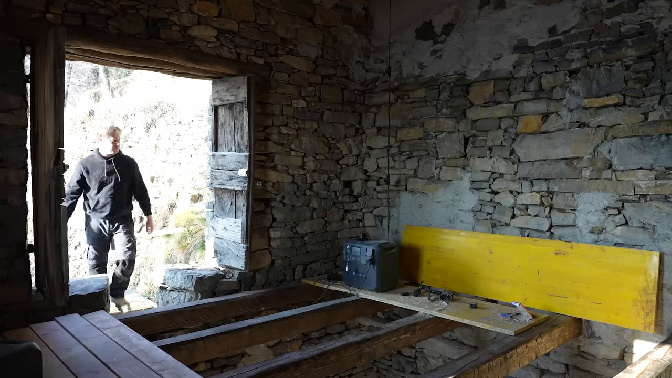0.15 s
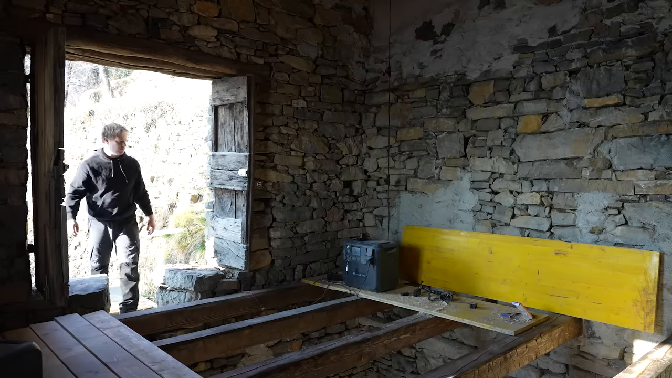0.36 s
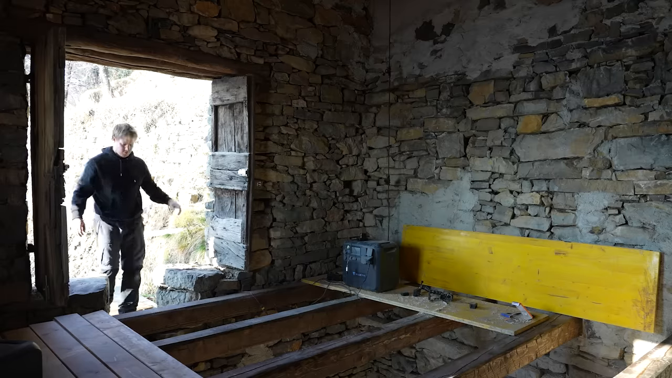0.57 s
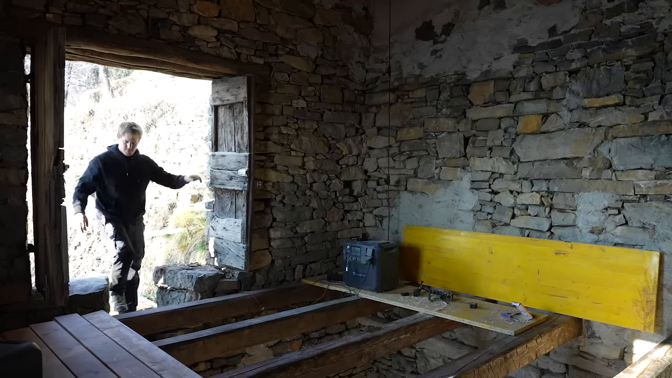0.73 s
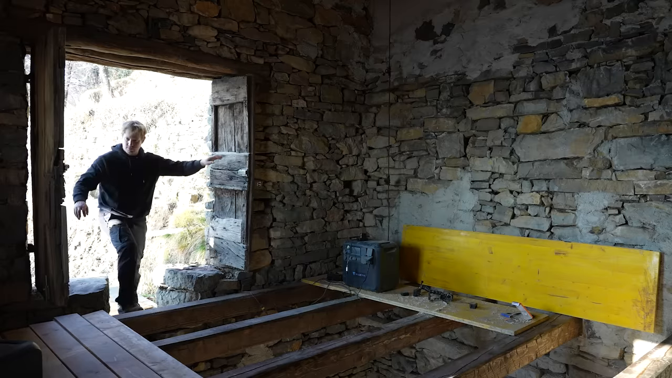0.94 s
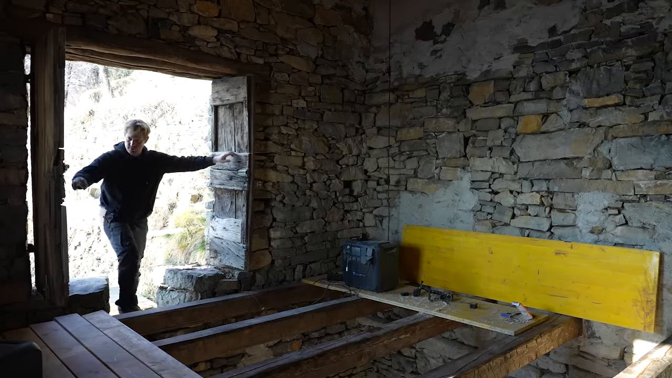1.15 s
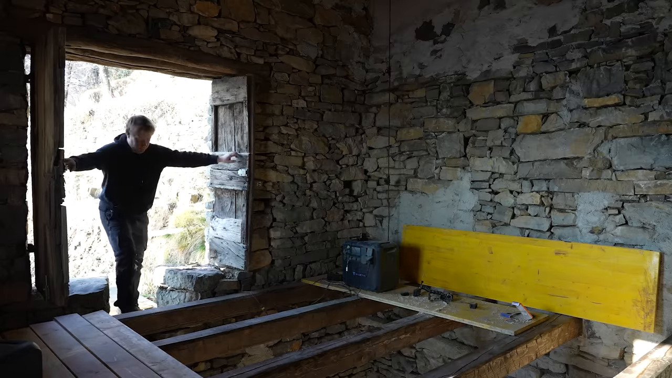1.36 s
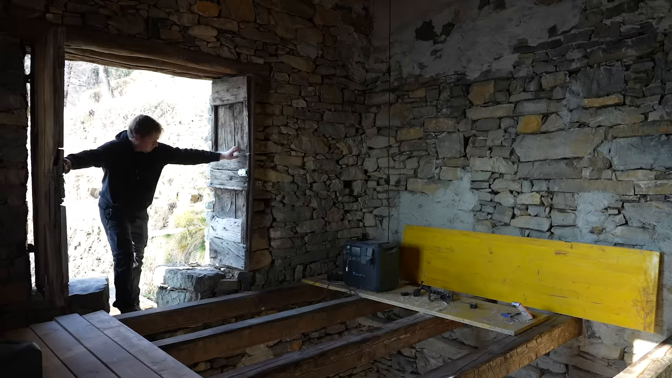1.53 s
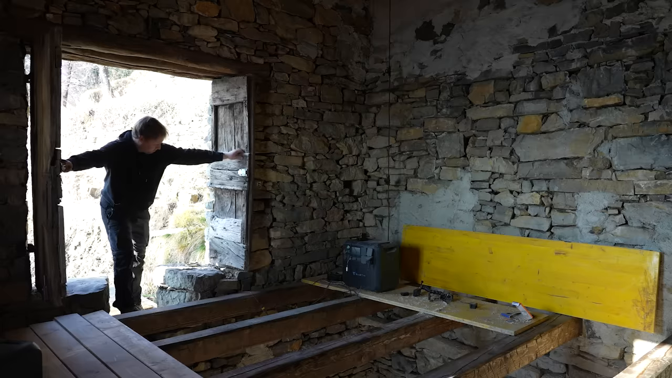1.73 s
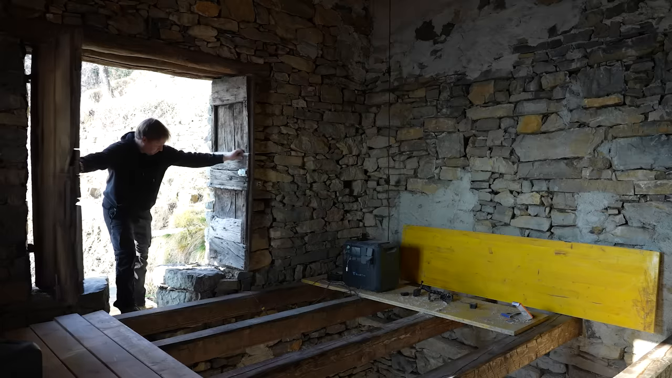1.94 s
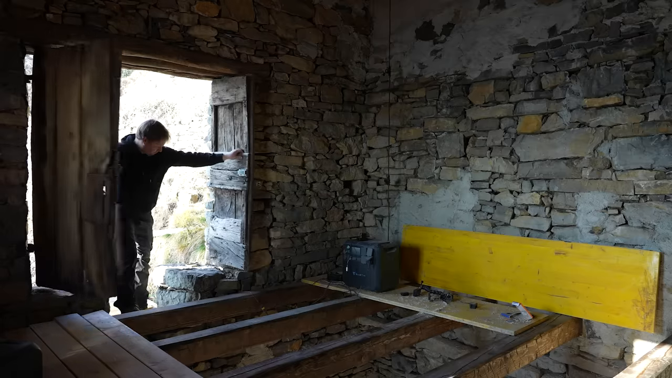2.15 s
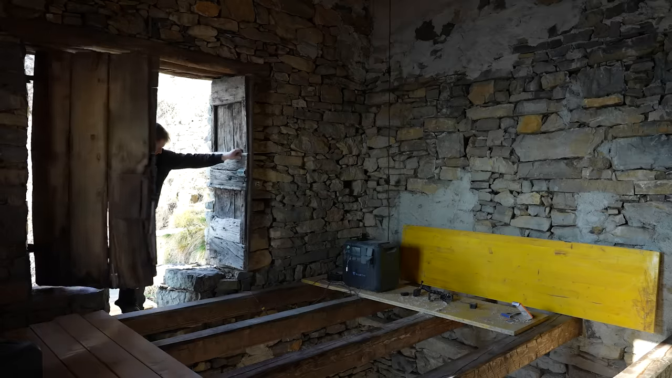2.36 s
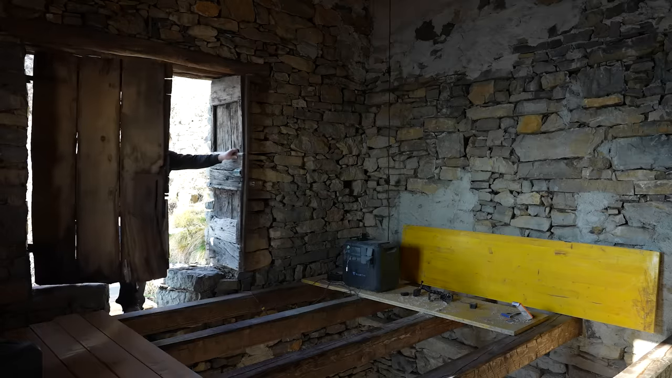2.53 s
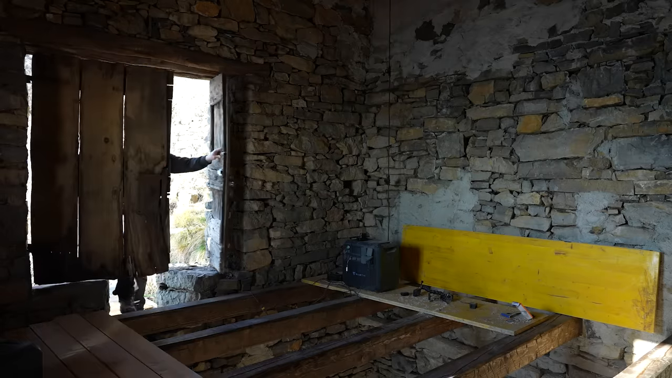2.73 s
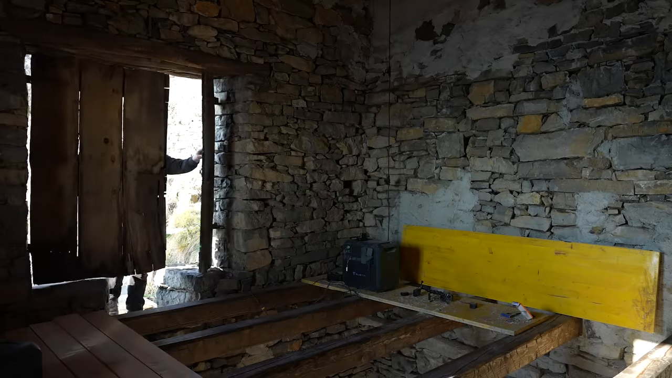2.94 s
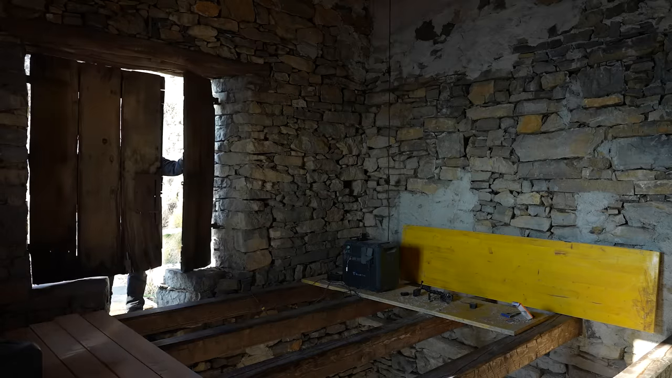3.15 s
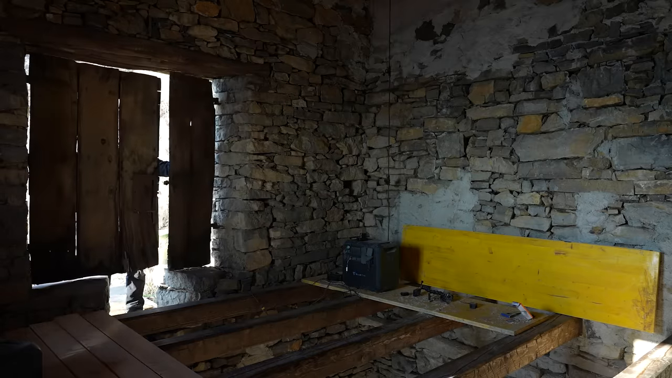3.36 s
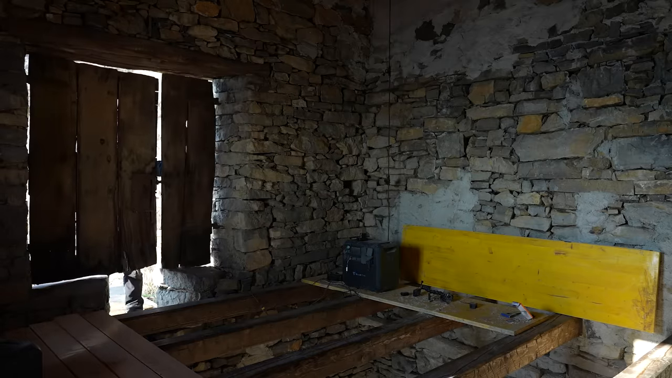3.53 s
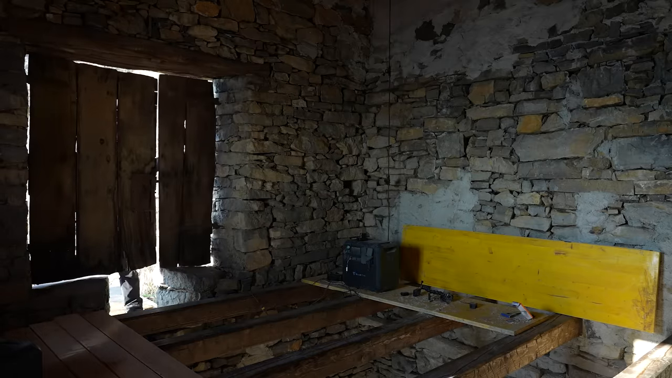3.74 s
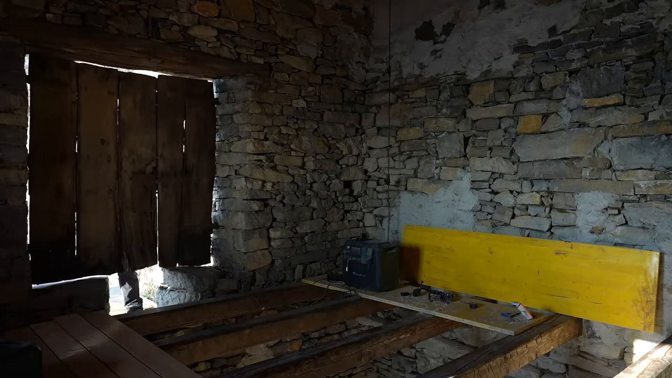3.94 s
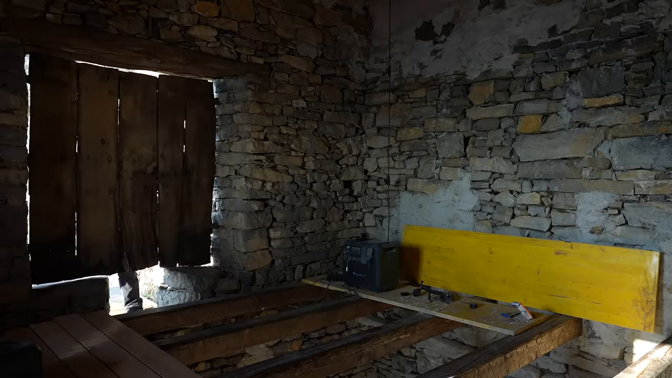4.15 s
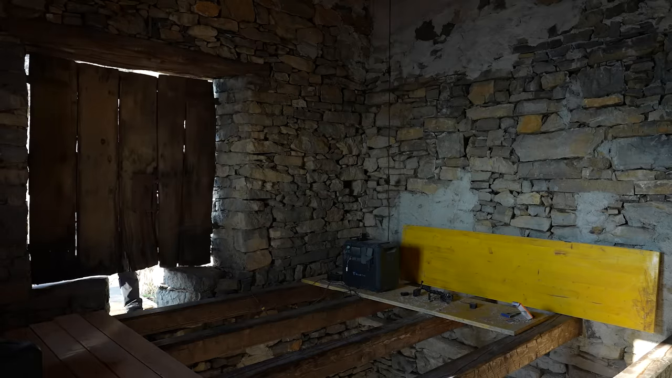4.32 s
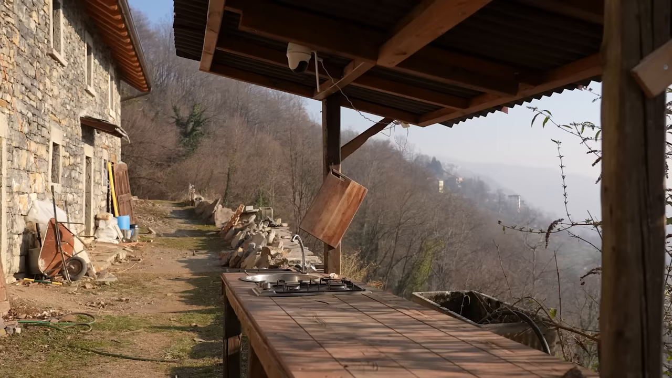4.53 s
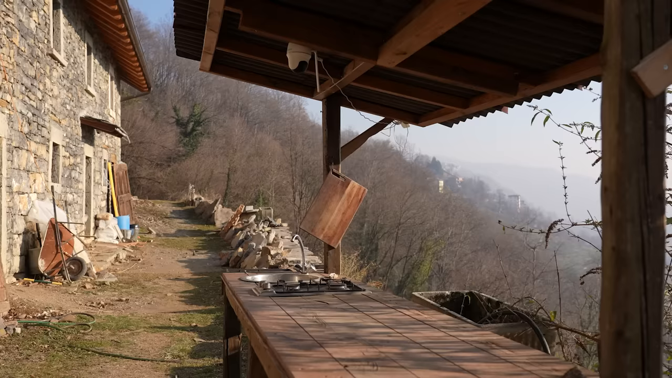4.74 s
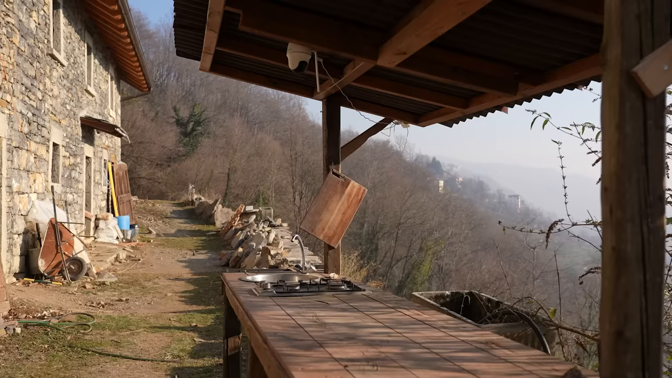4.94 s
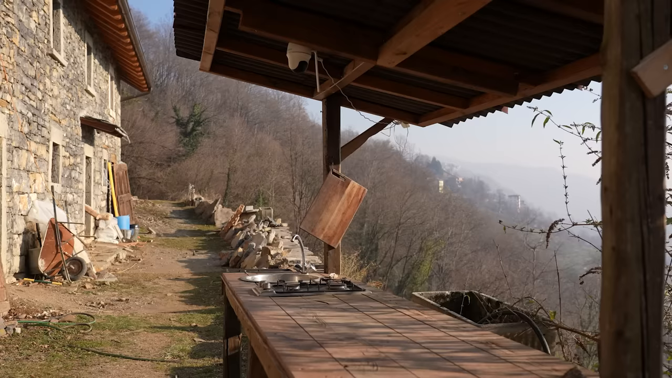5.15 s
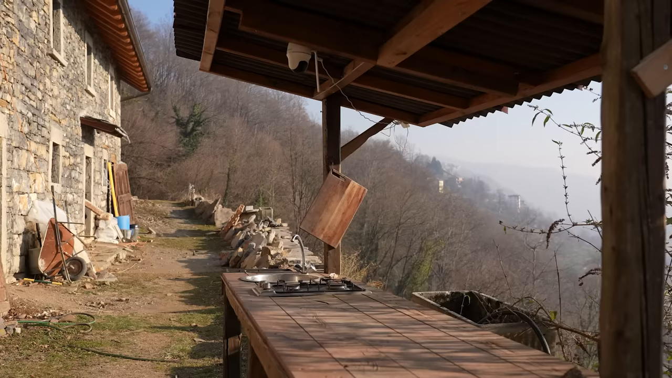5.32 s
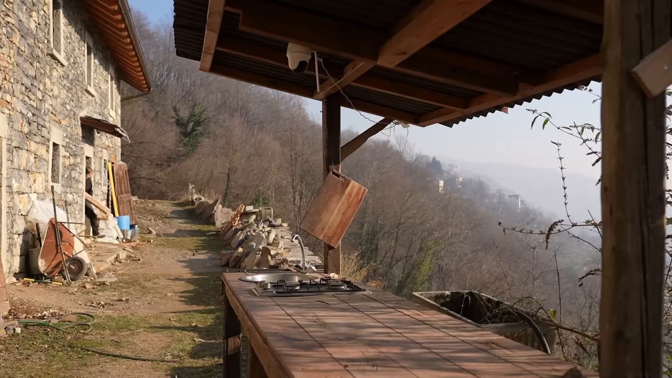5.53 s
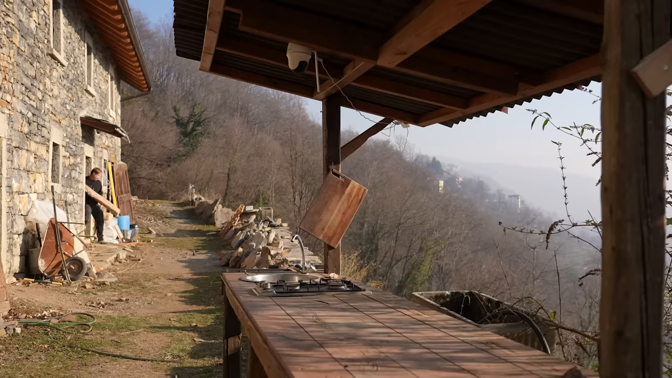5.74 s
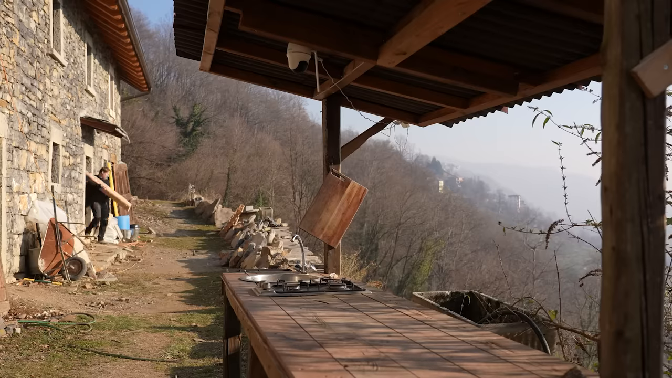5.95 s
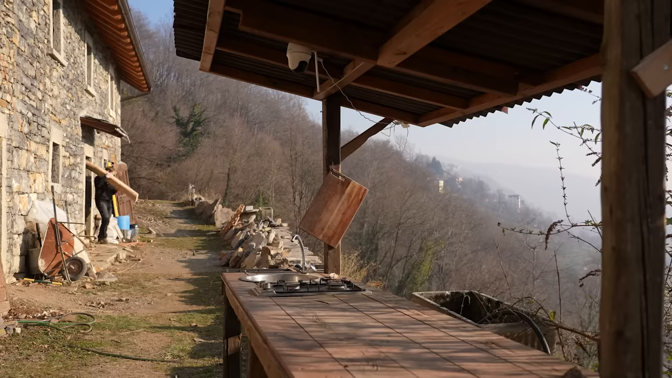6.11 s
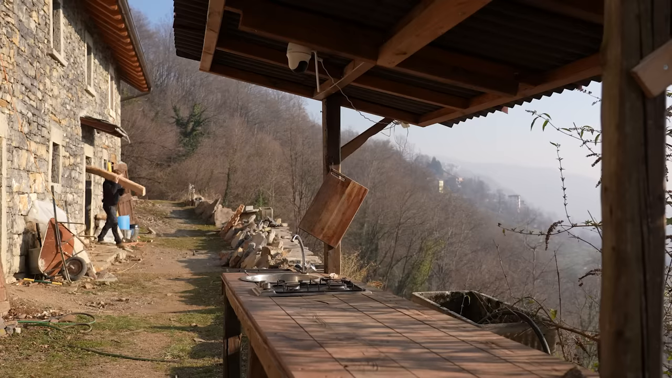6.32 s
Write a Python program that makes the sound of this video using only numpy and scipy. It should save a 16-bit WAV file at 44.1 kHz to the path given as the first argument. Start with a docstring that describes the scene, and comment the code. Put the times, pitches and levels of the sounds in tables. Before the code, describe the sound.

Light steps and scuffs on boards, a heavy knock, then an iron latch clicks. Two dry wooden leaves swing closed with thin wavering squeals that overlap, peaking in a piercing, pitch-bending shriek with a hollow lower tone. Wood groans and bangs, with a short stony reverberation. After the last thunk everything drops to faint hillside rumble, barely audible far bird calls and tiny distant knocks, heard from a fixed position.

```python
"""Steps and knocks sound first, in a small stone room: decaying noise through wood, edge and iron spectra.
Two old plank door leaves are then pulled shut: the panel booms as a low sine, the rusty hinge pins squeal
as wavering harmonic tones, several at once, and the wood drags as shaped noise. Last comes the open air:
rumble and hiss of filtered noise, a far cockerel and a small bird as gliding tones, and light ticks."""
import sys
import numpy as np
from scipy import signal
from scipy.fft import rfft, irfft, next_fast_len
from scipy.io import wavfile
from scipy.ndimage import map_coordinates

SR = 44100
rng = np.random.default_rng(int(sys.argv[2]) if len(sys.argv) > 2 else 0)


def pcm_store(signal):
    """Save signal as 16-bit PCM."""
    levels = np.round(np.clip(np.atleast_2d(signal), -1, 1) * 32767)
    wavfile.write(sys.argv[1], SR, levels.astype(np.int16).T)


N = 285856

# Long hinge notes, one list each: (time [s], pitch [Hz], fundamental [dB], 2nd partial [dB])
HINGE_NOTES = [
    [(2.13, 2835, -46.5, -62.5), (2.155, 2815, -35.5, -34.5), (2.22, 2790, -25.5, -31),
     (2.28, 2755, -26.5, -36.5), (2.32, 2765, -25, -22), (2.4, 2699, -22.5, -25.5), (2.52, 2676, -36, -48),
     (2.56, 2760, -28, -42.5), (2.62, 2790, -32, -48), (2.69, 2830, -45, -60.5)],
    [(2.655, 3386, -31.5, -36.5), (2.765, 3123, -41.5, -49), (2.81, 3133, -22.5, -32),
     (2.885, 3092, -25.5, -21.5), (3.0, 3019, -34, -42.5), (3.2, 3080, -57, -68.5)],
    [(2.975, 4415, -39.5, -72.5), (3.05, 4316, -24, -34), (3.085, 4290, -15.5, -21),
     (3.17, 4228, -13, -24.5), (3.285, 4274, -14.5, -34.5), (3.37, 4228, -19.5, -37),
     (3.4, 4134, -27.5, -44), (3.48, 4188, -23.5, -31.5), (3.56, 4163, -28, -47),
     (3.72, 4187, -43.5, -66.5)],
    [(2.98, 1344, -52.5, -70.5), (3.02, 1180, -31, -45.5), (3.06, 1182, -27, -36.5),
     (3.125, 1167, -39.5, -30), (3.18, 1158, -27, -34.5), (3.235, 1154, -30.5, -38.5),
     (3.33, 1121, -41, -53)],
]
# Grip of the pin in each long note: (pitch waver [share], throb [dB], 3rd over 2nd partial [dB],
# 4th over 3rd partial [dB], further fall [dB per partial])
HINGE_GRIP = [(.005, 3.5, -9, -11.5, 4), (0.005, 4, -12.5, -6, 7.5), (.001, 3, -2, -18.5, 10),
              (.006, 3, -17, -1, 9)]
# Short hinge notes: (start [s], rise [s], length [s], first pitch [Hz], last pitch [Hz], peak [dB],
# fall [dB/s], 2nd over 1st partial [dB], 3rd over 2nd partial [dB], pitch waver [share])
SQUEAKS = [(2.065, 0.021, 0.13, 893, 912, -33.5, 122, -17.5, -14, 0.039),
           (2.385, .01, .15, 2310, 2240, -29, 170, -16, -4.5, .03),
           (2.87, .01, .11, 1833, 1814, -45, 99, -20.5, -17, .005),
           (3.288, .022, 0.23, 2378, 2280, -22, 80.5, -15, -17.5, 0.01)]
# Grip in the short notes: (throb [dB], 4th over 3rd partial [dB], further fall [dB per partial])
SQUEAK_GRIP = (5.8, -22, 12)
# Hollow odd-partial note, settling an octave under the loudest note:
# (time [s], pitch [Hz], fundamental [dB], 3rd partial [dB])
HOLLOW_NOTE = [(3.3, 2217, -42, -36), (3.345, 2160, -28, -21), (3.375, 2140, -30, -37),
               (3.4, 2086, -17.5, -29.5), (3.48, 2090, -17.5, -25.5), (3.535, 2079, -30, -24.5),
               (3.56, 2095, -50, -47)]
# Its grip: (pitch waver [share], throb [dB], 5th over 3rd partial [dB], 7th over 5th [dB],
# further fall [dB per partial])
HOLLOW_GRIP = (0.01, 4, -13, -10.5, 8)
# Jolts of the leaf that break up the squeal: (start [s], end [s], pitch waver [factor])
JOLTS = [(2.377, 2.68, 2.8), (3.293, 3.388, 2.8), (3.522, 3.75, 7.8)]
# Pins briefly losing their grip: (time [s], level change [dB], half length [s])
FALTERS = [(2.187, -12, 0.0019), (2.287, -11, 0.013), (2.374, -16.5, 0.0025), (2.505, -29.5, 0.0049),
           (2.538, -34.5, .006), (2.631, -12.5, 0.006), (2.86, -12.5, 0.0081), (3.137, -6.5, 0.0072),
           (3.182, -8, 0.0021), (3.203, -11, 0.0039), (3.264, -11.5, 0.0053), (3.386, -6.5, 0.0094),
           (3.531, -14.5, 0.0055)]
# Groan of each leaf as it moves: (time [s], level [dB])
LEAF_DRAG = [
    [(2.029, -43.5), (2.35, -46), (2.64, -39.5), (2.77, -29.5), (3.05, -62), (3.2, -62.5)],
    [(3.2, -65), (3.3, -53.5), (3.45, -63), (3.62, -46.5), (3.82, -53), (3.95, -39), (4.35, -67)],
]
# Shake of the frame over the groan, one value per leaf: (level [dB])
FRAME_SHAKE = [-5.5, 4.5]
# Spectrum of the groan: (frequency [Hz], relative density [dB])
GROAN_SPECTRUM = [(53, -30.5), (90, 0.5), (119, -0.5), (201, -1), (319, 1), (797, 0), (1420, -10.5),
                  (2600, -16.5), (3380, -45.5), (5720, -120)]
# Grit grinding in the hinges: (peak time [s], peak [dB], rise [dB/s], fall [dB/s])
GRIT_SWELLS = [(2.77, -55.5, 79.5, 50), (3.62, -43.5, 44.5, 69.5), (3.95, -64, 70, 85)]
# Swells of the panel's lowest mode: (peak time [s], peak [dB], rise [dB/s], fall [dB/s], pitch [Hz])
PANEL_SWELLS = [(1.16, -31, 256, 69, 79.5), (1.33, -37.5, 118, 55, 80.6), (2.28, -34, 198, 224, 71),
                (2.4, -34, 238, 210, 72.9), (2.52, -28, 300, 260, 73), (2.66, -34.5, 149, 56, 75),
                (2.76, -34, 99, 106, 73.4)]
# Blows, levels before decay and room: (time [s], wood [dB], hard edge [dB], edge pitch [Hz],
# iron [dB], decay time constant [s])
KNOCKS = [(0.009, -43.5, -52, 1960, -61, 0.012), (0.435, -40.5, -66, 1560, -73, 0.01),
          (0.448, -44.5, -54, 2920, -61.5, 0.021), (0.531, -57, -45, 2920, -76, 0.011),
          (0.557, -39.5, -43.5, 2120, -72, 0.013), (0.763, -65, -73, 2580, -59, 0.067),
          (1.042, -46, -65, 2350, -81.5, 0.055), (1.077, -18.5, -25.5, 2130, -64, 0.014),
          (1.271, -50, -46, 2180, -69, 0.0091), (1.451, -49, -54, 1870, -65.5, 0.025),
          (1.483, -43, -55, 1940, -62, 0.0113), (1.694, -51, -58.5, 2200, -78, 0.011),
          (1.749, -42.5, -43, 2640, -48.5, 0.014), (1.87, -40, -46, 2330, -21, 0.005),
          (1.881, -30, -40, 2330, -23, 0.008), (2.057, -37, -45, 1780, -56, 0.015),
          (2.216, -29, -40, 2820, -72, 0.0096), (2.355, -29.5, -36, 2750, -46.5, 0.013),
          (2.387, -26.5, -43, 2690, -40.5, 0.0048), (2.6, -29.5, -40, 2840, -64.5, 0.045),
          (2.72, -20, -28, 3230, -29, 0.013), (2.749, -24, -37, 1930, -48.5, 0.0083),
          (2.795, -25.5, -30, 3130, -24, 0.017), (3.23, -17, -26, 2300, -26.5, 0.016),
          (3.517, -41.5, -35, 2070, -36.5, 0.032), (3.622, -25, -29, 2100, -31, 0.022),
          (3.853, -41, -38.5, 2710, -43, 0.053), (3.901, -17, -27.5, 1840, -23.5, 0.013),
          (4.076, -33, -40, 1500, -69, 0.0072), (4.127, -53, -59, 2310, -46, 0.015),
          (4.235, -45, -60, 2290, -90.5, 0.016)]
# Resonances of the planks: (centre [Hz], width [Hz], relative level [dB])
PLANK_MODES = [(151.4, 52, -3), (300, 160, -2), (523, 270, -1), (850, 390, -1), (1270, 590, -6)]
# Resonances of the hard edges: (centre [Hz], width [Hz], relative level [dB])
EDGE_MODES = [(1690, 760, 0), (2160, 1000, 1.5), (3030, 500, -1.5), (3450, 110, -2), (4270, 830, -10.5)]
# Spectrum of the iron latch, used for the grit too: (frequency [Hz], relative density [dB])
IRON_SPECTRUM = [(880, -35.5), (1500, -8.5), (1780, -5), (3000, -9), (3880, -5), (6560, -6.5), (7460, -9),
                 (13800, -11), (16000, -21)]
# Reverberation of the stone room: (frequency [Hz], time to fall 60 dB [s])
ROOM_DECAY = [(100, 0.68), (420, 0.43), (1100, .39), (3000, 0.44), (8000, 0.32), (15000, 0.14)]
# Far calls: columns as in SQUEAKS
FAR_CALLS = [(4.38, .35, .66, 715, 655, -72, 10, 8, -11, .04),
             (4.98, .1, .26, 553, 525, -66, 20, -6, -20, .03),
             (4.97, .03, .11, 6980, 6920, -82, 110, -40, -9, .01),
             (6.22, .15, .24, 2830, 2820, -78, 30, -30, -9, .015),
             (6.39, .02, .09, 1200, 1270, -67, 20, -32, -9, .02)]
# Ticks, pings and scrapes: (time [s], level before onset and decay [dB], centre [Hz], width [Hz],
# time to fall 20 dB [s])
TICKS = [(.562, -45.5, 5640, 1590, 0.12), (0.556, -38, 480, 200, 0.088), (.622, -44.5, 2850, 720, 0.092),
         (.925, -65, 3260, 503, 0.12), (1.101, -49, 4210, 160, 0.15), (4.372, -66.5, 1810, 300, 0.074),
         (4.425, -66, 9500, 2985, 0.11), (4.479, -65, 2990, 1198, .02), (5.765, -58, 1500, 2000, 0.06),
         (5.85, -70, 2800, 900, .03), (5.897, -62, 3500, 1500, .015), (5.943, -70, 2600, 600, .03),
         (6.015, -62, 1800, 1800, 0.045), (6.34, -71, 4980, 3020, 0.18)]
# Background, indoors and then outdoors: (time [s], rumble [dB], hiss [dB])
AIR_LEVELS = [(0, -57, -69.5), (.15, -60, -64), (.35, -70, -73), (.8, -66.5, -67.5), (4.33, -69.5, -82.5),
              (4.42, -59, -83), (5.6, -59, -80), (6.48, -59, -72)]
# Spectrum of the rumble: (frequency [Hz], relative density [dB])
RUMBLE_SPECTRUM = [(35, -36.5), (60, -1), (272, -16.5), (430, -18), (600, -16.5), (1000, -18), (1600, -24),
                   (2300, -33.5), (3300, -47.5), (6000, -70)]
# Spectrum of the hiss: (frequency [Hz], relative density [dB])
HISS_SPECTRUM = [(1500, -7.5), (3000, 2), (7000, -5.5), (9700, -1), (12000, -5), (15500, -2.5)]
# Level of the lowest bass: (time [s], level [dB])
BASS_LEVELS = [(0, -57), (.95, -82.5), (1.15, -42), (1.8, -74), (2.8, -51), (3.1, -66.5), (3.65, -46.5),
               (4.0, -51.5), (4.4, -68), (5.45, -65), (6.0, -79), (6.48, -77.5)]

RISE_DB = 9  # a short note starts this far under its peak
MIX_LOW_DB, MIX_SQUEAK_DB = -2, 1  # gains of the loudest note's two partners in the product
JOLT_EDGE_S = .04
TOP_HZ = 15830  # upper band limit
T = np.arange(N) / SR


def hinges():
    """Stick-slip friction makes the pins sing; a product of notes adds sum and difference tones."""
    sung = np.zeros((len(HINGE_NOTES) + 1, N))
    for track, rows, grip in zip(sung, HINGE_NOTES, HINGE_GRIP):
        add(track, rows[0][0], note(rows, *grip))
    add(sung[-1], HOLLOW_NOTE[0][0], note(HOLLOW_NOTE, *HOLLOW_GRIP, order=2))
    squeaks = [short_note(row, *SQUEAK_GRIP) for row in SQUEAKS]

    loudest = sung[2]
    partners = amp(MIX_LOW_DB) * sung[3] + amp(MIX_SQUEAK_DB) * squeaks[3]
    mixed = loudest * partners

    falter_db = sum(db * np.exp(-((T - s) / half) ** 2) for s, db, half in FALTERS)
    direct = amp(falter_db) * (sung.sum(axis=0) + sum(squeaks) + mixed)
    return direct + amp(-13) * echo(direct)[:N]


def note(rows, waver, throb_db, third_db, fourth_db, fall_db, order=1):
    """Harmonic synthesis: six partials, spaced by order, share a wavering phase and throb separately."""
    t = np.arange(rows[0][0], rows[-1][0], 1 / SR)
    hz, first_db, second_db = curves(rows, t)
    upper_db = second_db + third_db + fourth_db
    levels = [first_db, second_db, second_db + third_db]
    levels += [upper_db - fall_db * k for k in range(3)]

    jolt = 1 + sum((factor - 1) * window(t, start, end, JOLT_EDGE_S, JOLT_EDGE_S)
                   for start, end, factor in JOLTS)
    unrest = jolt * wobble(320, len(t))
    phase = 2 * np.pi * np.cumsum(hz * (1 + waver * unrest)) / SR

    tone = np.zeros(len(t))
    for k, db in enumerate(levels):
        harmonic = order * k + 1
        audible = harmonic * hz < SR / 2.4  # keeps partials clear of aliasing
        throb = throb_db * wobble(47.3, len(t))
        tone += amp(db + throb) * np.sin(harmonic * phase) * audible
    return np.sqrt(2) * window(t, t[0], t[-1], .008, 0.007) * tone


def short_note(row, throb_db, fourth_db, fall_db):
    """A gliding harmonic tone: level rises to a peak and falls linearly in dB while pitch slides."""
    s, rise, length, first_hz, last_hz, peak_db, fall, second_db, third_db, waver = row
    corners = [(0, peak_db - RISE_DB), (rise, peak_db), (length, peak_db - fall * (length - rise))]
    slide = (last_hz - first_hz) / length  # Hz/s
    rows = [(s + t, first_hz + slide * t, db, db + second_db) for t, db in corners]
    track = np.zeros(N)
    add(track, s, note(rows, waver, throb_db, third_db, fourth_db, fall_db))
    return track


def drag():
    """Sliding friction as broadband noise: leaves groan, the frame shakes, grit grinds in the hinges."""
    groan = amp(2.5 * wobble(30, N)) * noise(shape(GROAN_SPECTRUM))
    shake_spectrum = shape([(40, -25), (80, 8), (150, 0.5), (220, -34.5)])
    shake = amp(2 * wobble(15, N)) * noise(shake_spectrum)
    grit_db = swells(GRIT_SWELLS) + 2.8 * wobble(84, N) + 3 * wobble(400, N)
    out = amp(grit_db) * noise(shape(IRON_SPECTRUM))
    for rows, shake_db in zip(LEAF_DRAG, FRAME_SHAKE):
        moving = window(T, rows[0][0], rows[-1][0], .041, .041)
        out += moving * amp(curves(rows, T)[0]) * (groan + amp(shake_db) * shake)
    return out


def panel():
    """The lowest bending mode of the leaf: a sine whose pitch drifts and whose level swells."""
    times, pitches = np.transpose(PANEL_SWELLS)[[0, 4]]
    hz = np.interp(T, times, pitches) * (1 + .03 * wobble(16, N))
    level = amp(swells(PANEL_SWELLS) + 1.5 * wobble(6.5, N))
    return np.sqrt(2) * level * np.sin(2 * np.pi * np.cumsum(hz) / SR)


def knocks():
    """Impact excitation: decaying noise rings planks, hard edges and iron, and the walls answer."""
    out, t = np.zeros(N), np.arange(SR // 5) / SR
    for s, wood_db, edge_db, edge_hz, iron_db, decay in KNOCKS:
        rattle = np.exp(-t / decay) * amp(2.2 * wobble(150, len(t)))
        give = 1 - np.exp(-t / (0.4 * decay))  # wood yields, iron starts almost at once
        # every spot rings the modes differently
        struck = [(hz, width, db + rng.normal(0, 1)) for hz, width, db in PLANK_MODES]
        wood = noise(lambda f: modes(struck)(f) / (1 + (f / 2200) ** 3), len(t))
        edge_peak = modes([(edge_hz, .5 * edge_hz, 0)])
        edge = noise(lambda f: modes(EDGE_MODES)(f) * edge_peak(f), len(t))
        iron = noise(shape(IRON_SPECTRUM), len(t))

        blow = give * amp(wood_db) * wood
        blow += give ** 0.88 * amp(edge_db) * edge
        blow += give ** 0.35 * amp(iron_db) * iron
        blow *= rattle
        add(out, s, amp(0.5) * blow)
        add(out, s, echo(blow))
    return out


def small_sounds():
    """Gliding tones give a far, hoarse cockerel and birds; resonant noise bursts give small ticks."""
    out = sum(short_note(row, throb_db=3.5, fourth_db=-27, fall_db=9) for row in FAR_CALLS)
    t = np.arange(SR // 3) / SR
    for s, db, hz, width, length in TICKS:
        onset = 1 - np.exp(-t / (0.017 * length))
        resonance = modes([(hz, width, 0)])
        burst = noise(lambda f: resonance(f) ** 2, len(t))
        add(out, s, amp(db - 20 * t / length) * onset * burst)
    return out


def air():
    """Stationary noise under slow level curves: lumpy distant rumble, hiss and swelling deep bass."""
    rumble_db, hiss_db = curves(AIR_LEVELS, T)
    bass_db = curves(BASS_LEVELS, T)[0] + 4.8 * wobble(4.8, N)
    bass_spectrum = shape([(15, -24), (30, -4), (50, 5.5), (75, 1.5), (110, -38.5)])
    bass = amp(bass_db) * noise(bass_spectrum)
    rumble = amp(rumble_db + 1.2 * wobble(7.6, N)) * noise(shape(RUMBLE_SPECTRUM))
    hiss = amp(hiss_db) * noise(shape(HISS_SPECTRUM))
    return rumble + hiss + bass


def echo(x):
    """Diffuse reverberation: a fresh noise tail, each frequency dying at its own rate."""
    hz, t, z = signal.stft(rng.standard_normal(SR // 2), SR, nperseg=256)
    f, t60 = np.transpose(ROOM_DECAY)
    decay = amp(-60 * t / np.interp(hz, f, t60)[:, None])
    tail = signal.istft(z * decay, SR, nperseg=256)[1]
    delayed = np.pad(x, (SR // 150, 0))  # the first reflection arrives late
    return signal.fftconvolve(delayed, tail / np.linalg.norm(tail))


def modes(rows):
    """Modal superposition: damped resonances summed with alternating sign."""
    def response(f):
        return sum((-1) ** k * amp(db) * 1j * f * w / (c * c - f * f + 1j * f * w)
                   for k, (c, w, db) in enumerate(rows))
    return response


def shape(points):
    """Spectral envelope: response through (frequency [Hz], level [dB]) points on a log axis."""
    f, db = np.transpose(points)
    return lambda hz: amp(np.interp(np.log(hz + 1), np.log(f), db))


def filtered(x, response):
    """Linear filtering: the spectrum of x times a response of frequency."""
    m = next_fast_len(len(x) + 8192)
    return irfft(rfft(x, m) * response(np.fft.rfftfreq(m, 1 / SR)), m)[:len(x)]


def noise(response, size=N):
    """Coloured noise: filtered white noise at rms 1."""
    return unit(filtered(rng.standard_normal(size), response))


def swells(rows):
    """Envelope maximum: straight dB rises and falls about each peak, the strongest leading."""
    s, db, rise, fall = np.transpose(rows)[:4, :, None]
    return np.max(db - np.maximum(rise * (s - T), fall * (T - s)), axis=0)


def wobble(rate, size):
    """Band-limited random modulation: a smooth curve through rate random knots a second."""
    knots = rng.standard_normal(int(size * rate / SR) + 4)
    return map_coordinates(knots, [np.arange(size) * rate / SR])


def window(t, start, end, rise, fall):
    """Gating: 0 outside start..end, with straight ramps up to 1."""
    return np.clip(np.minimum((t - start) / rise, (end - t) / fall), 0, 1)


def curves(rows, times):
    """Linear interpolation: each column after the first, read at the given times."""
    s, *cols = np.transpose(rows)
    return [np.interp(times, s, c) for c in cols]


def amp(db):
    """Logarithmic level: the amplitude gain of a level in dB."""
    return 10 ** (np.asarray(db) / 20)


def unit(x):
    """Power normalisation: x at rms 1."""
    return x / np.sqrt(np.mean(x ** 2) + 1e-20)


def add(track, s, sound):
    """Superposition: mix sound into track from second s."""
    part = track[round(s * SR):][:len(sound)]
    part += sound[:len(part)]


def scene():
    """Superposition of the pressures of all sources at one microphone."""
    return (hinges() + drag() + panel() + knocks() + small_sounds() + air())[None]


def record(dry):
    """Band limitation: nothing at or above TOP_HZ passes."""
    return filtered(dry[0], lambda hz: hz < TOP_HZ)[None]


dry = scene()
out = record(dry)
pcm_store(out)
```